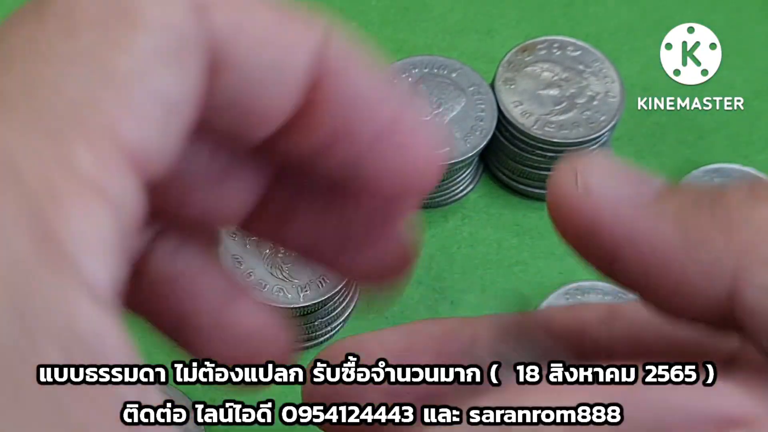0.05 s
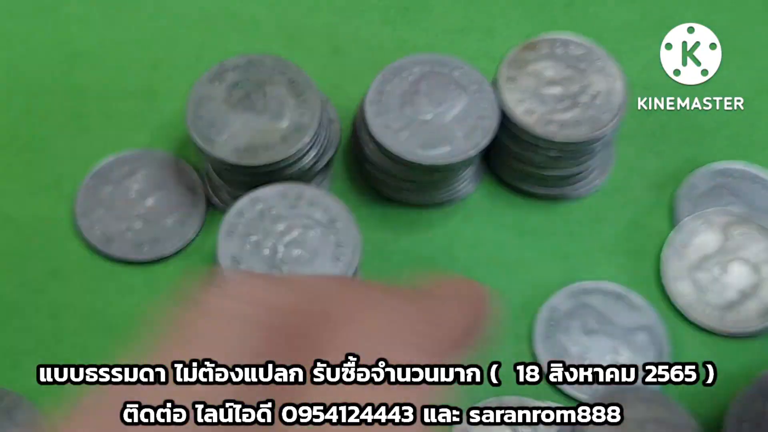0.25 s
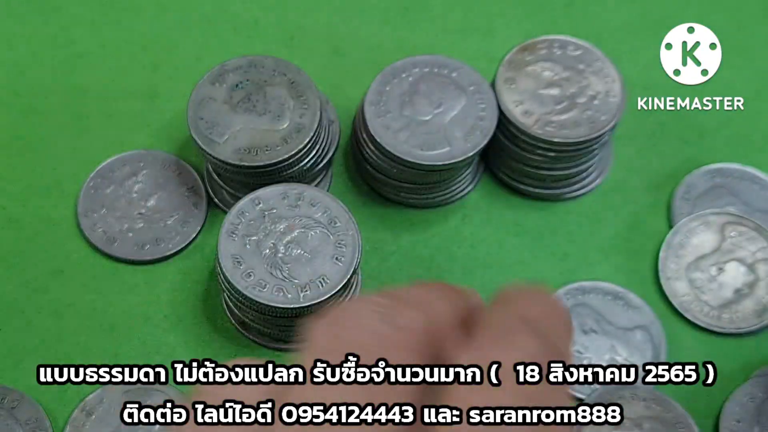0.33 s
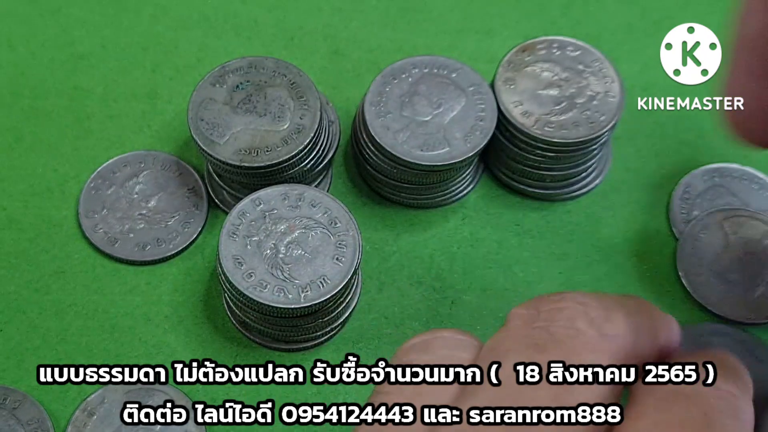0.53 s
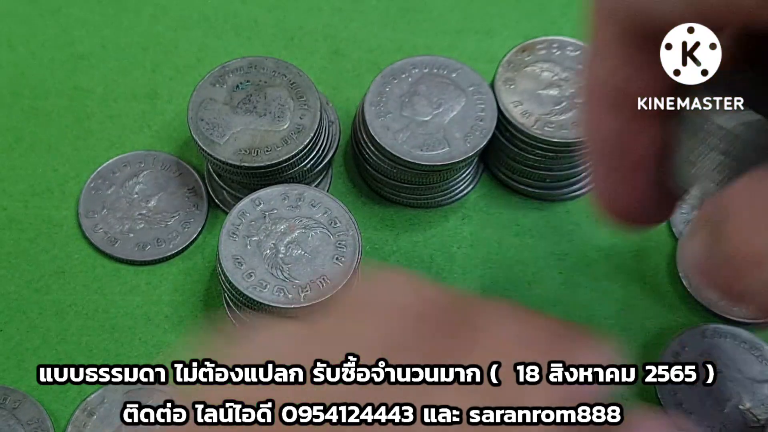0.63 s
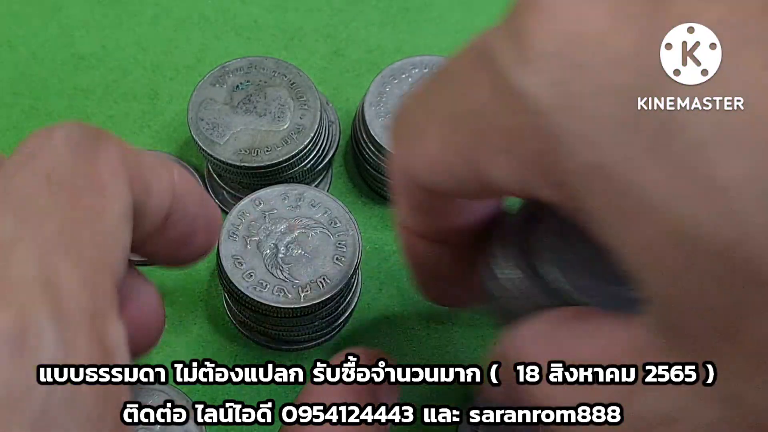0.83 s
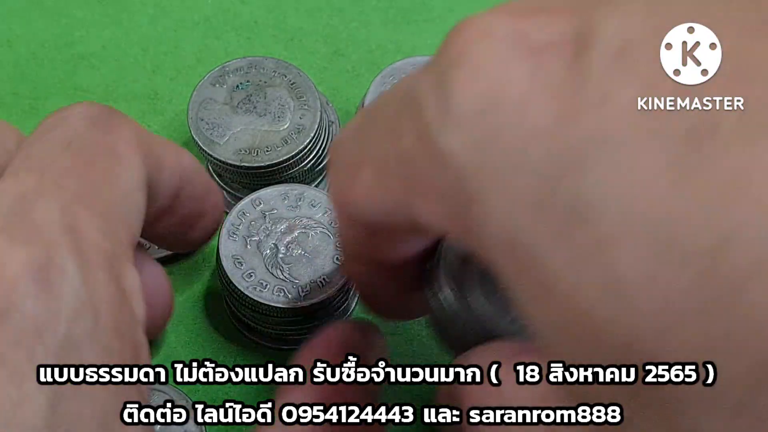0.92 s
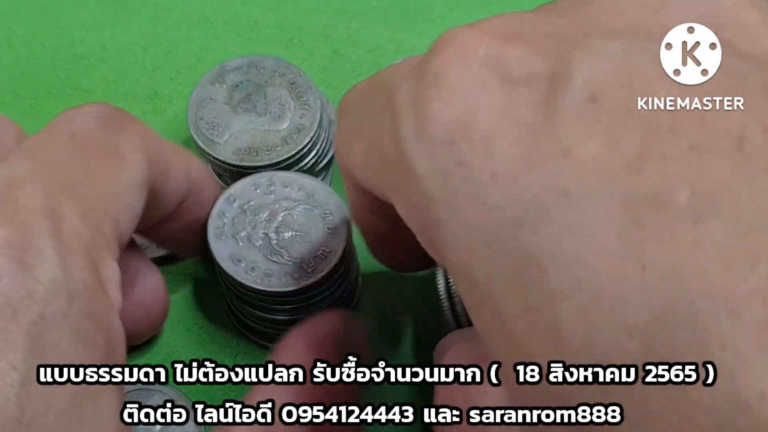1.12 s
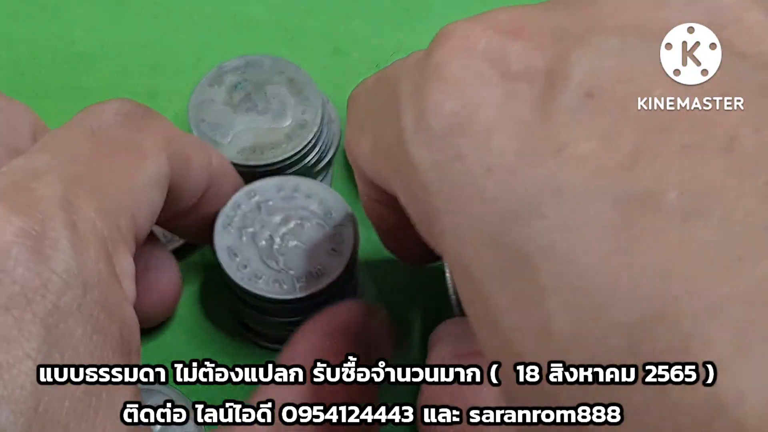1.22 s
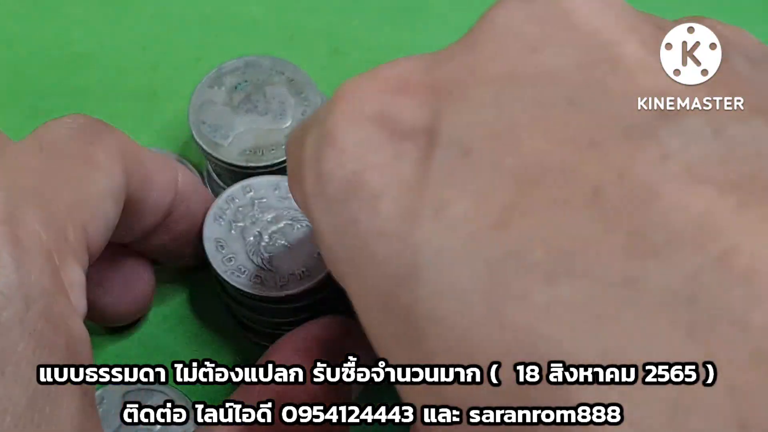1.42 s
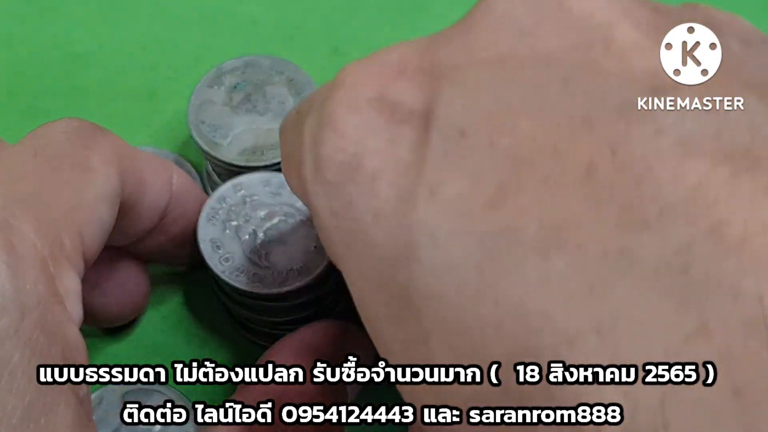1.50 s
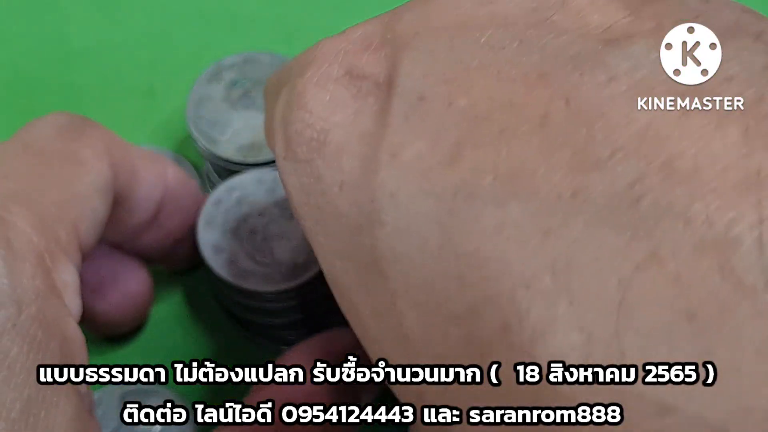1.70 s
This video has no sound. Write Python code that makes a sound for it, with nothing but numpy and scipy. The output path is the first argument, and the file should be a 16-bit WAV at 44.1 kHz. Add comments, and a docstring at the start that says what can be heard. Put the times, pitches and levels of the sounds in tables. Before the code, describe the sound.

Metal coins clink and tick as they are stacked by hand on a cloth-covered table.

```python
"""Metal coins, dropped, gathered and stacked on a cloth-covered table, close to the microphone.
Free coins clink with a high beating ring; held coins only tick and scrape against each other.
Hands bump and brush the table and drag the stacks over the cloth.
The place is a small room: a short tail follows each contact, over quiet air and a faint mains hum."""
import sys
import numpy as np
from scipy import signal
from scipy.fft import rfft, irfft
from scipy.io import wavfile

SR = 44100
rng = np.random.default_rng(int(sys.argv[2]) if len(sys.argv) > 2 else 0)


def waveform_to_disk(signal):
    """Save audio, clipped to [-1, 1], as 16-bit WAV at the path in sys.argv[1]."""
    frames = np.transpose(np.atleast_2d(signal))
    scaled = np.clip(frames, -1, 1) * 32767
    samples = np.round(scaled).astype(np.int16)
    wavfile.write(sys.argv[1], SR, samples)


N = 77175

# likeness of coin contacts at the microphone's two sides: f/Hz, correlation
CONTACT_LIKENESS = [(1500, .8), (2800, 0.063), (4500, -0.035), (8000, -0.23), (10000, 0.6), (12500, 0.092)]


def amp(db):
    """Decibels to gain."""
    return 10 ** (np.asarray(db) / 20)


def unit(x):
    """Scales to rms 1."""
    return x / np.sqrt(np.mean(x ** 2) + 1e-20)


def read(points, hz):
    """Reads a table on a log-frequency axis."""
    f, value = np.transpose(points)
    return np.interp(np.log(hz + 1), np.log(f), value)


def pan(db):
    """Left and right gains, the left louder by db."""
    return amp([[db / 2], [-db / 2]])


def add(mix, s, sound):
    """Mixes a sound in at s seconds."""
    part = mix[:, max(round(s * SR), 0):][:, :sound.shape[-1]]
    part += sound[..., :part.shape[1]]


def stereo_white(likeness, size):
    """Two channels of white noise, as alike as the table says at each frequency."""
    left, other = rfft(rng.standard_normal((2, size)))
    correlation = np.clip(read(likeness, np.fft.rfftfreq(size, 1 / SR)), -1, 1)
    right = correlation * left + np.sqrt(1 - correlation ** 2) * other
    return irfft(np.array([left, right]), size)


def noise(colour, likeness):
    """Steady coloured stereo noise at rms 1."""
    gain = amp(read(colour, np.fft.rfftfreq(N, 1 / SR)))
    return unit(irfft(rfft(stereo_white(likeness, N)) * gain, N))


def swells(strokes):
    """Level curve with one rounded swell for each stroke."""
    level = np.zeros((2, N))
    for s, length, db in strokes:
        arch = np.sqrt(np.sin(np.linspace(0, np.pi, round(length * SR), endpoint=False)))
        add(level, s, amp(db) * arch)
    return level


def room_tone(air_db=-55.5):
    """Air and faint mains hum, steady behind the table."""
    # spectrum of the air: f/Hz, relative level/dB
    air_colour = [(15, -25), (30, -5), (60, -4.5), (130, -8), (330, -15), (600, -8.5), (1070, -17.5),
                  (1900, -15.5), (3500, -26), (5900, -32), (12900, -38.5), (16000, -37.5)]
    # likeness of the air on the two sides: f/Hz, correlation
    air_likeness = [(50, 0.64), (250, 0.98), (600, .35), (1500, 0.083), (5000, 0.14), (12000, .1)]
    # mains harmonics: f/Hz, rms level/dB
    harmonics = [(49, -60), (98, -66), (196, -68), (245, -71.5), (294, -70), (343, -70), (392, -71)]
    t = np.arange(N) / SR
    hum = sum(amp(db) * np.sqrt(2) * np.sin(2 * np.pi * (hz * t + rng.random())) for hz, db in harmonics)
    return amp(air_db) * noise(air_colour, air_likeness) + hum


def small_room(x, delay_s=0.0017):
    """Nearby walls return a short diffuse tail, each band dying at its own speed."""
    # reverberation time: f/Hz, t60/s
    decay_times = [(300, 0.1), (1500, .24), (4000, 0.13), (10000, 0.2), (16000, 0.21)]
    hz, t, spectra = signal.stft(rng.standard_normal((2, SR // 2)), SR, nperseg=256)
    decay = amp(-60 * t / read(decay_times, hz)[:, None])
    tail = signal.istft(spectra * decay, SR, nperseg=256)[1]
    tail *= np.clip(np.arange(tail.shape[1]) / SR / delay_s - 1, 0, 1)  # a gap, then a fade-in
    return signal.fftconvolve(x, tail / np.linalg.norm(tail[0]), axes=1)[:, :N]


def hands():
    """Hands shift with a low rumble, left of the microphone, and drag stacks over the cloth."""
    # hands shifting on the table: t/s, length/s, level/dB
    shifts = [(0.85, 0.19, -50), (0.98, 0.4, -50), (1.308, 0.15, -50.5), (1.464, .17, -59.5)]
    # spectrum of their rumble: f/Hz, relative level/dB
    rumble_colour = [(15, -28), (35, -9), (60, -1.5), (85, -1.5), (130, -17.5), (400, -22.5), (900, -64),
                     (3000, -69)]
    # stacks being dragged: t/s, length/s, level/dB
    drags = [(0.6, 0.095, -56), (0.84, 0.14, -51), (1.17, 0.13, -57.5)]
    # spectrum of the rubbed cloth: f/Hz, relative level/dB
    cloth_colour = [(100, -28), (220, -3), (330, 4.5), (520, -4.5), (800, -14.5), (2000, -29),
                    (8000, -59.5)]
    # likeness of both sounds on the two sides: f/Hz, correlation
    likeness = [(50, .3), (300, 0.47), (1000, 0.3)]
    rumble = swells(shifts) * pan(db=12) * noise(rumble_colour, likeness)
    rubbing = swells(drags) * noise(cloth_colour, likeness)
    return rumble + rubbing


def table_knocks(rise_cycles=0.98):
    """Fingers and stacks land on the padded table and briefly sound its modes."""
    # landings: t/s, level/dB, f/Hz, t60/s
    knocks = [(0.001, -35.5, 321.5, .07), (0.2317, -36.5, 1824, .018), (0.257, -43, 1467, .035),
              (0.504, -42.5, 59.3, 0.23), (0.601, -39, 321, 0.032), (0.671, -43, 467, 0.032),
              (0.852, -47.5, 427, 0.05), (0.915, -52, 397, 0.051), (0.969, -51.5, 362, .1),
              (1.062, -46.5, 405, 0.039), (1.182, -43.5, 414, 0.046), (1.261, -54.5, 322, 0.12),
              (1.571, -44.5, 302, 0.025)]
    # table modes: ratio to the knock's pitch, relative level/dB
    modes = [(0.721, -2.5), (1, 2.5), (1.231, 2.5), (1.75, -7)]
    out, t = np.zeros((2, N)), np.arange(SR // 4) / SR
    for s, db, hz, t60 in knocks:
        body = sum(amp(mode_db) * np.sin(2 * np.pi * (hz * ratio * t + rng.random()))
                   for ratio, mode_db in modes)
        rise = np.minimum(t * hz / rise_cycles, 1)
        add(out, s, body * rise * amp(db - 60 * t / t60))
    return out


def metal(x, tilt_db, size=512):
    """Gives impulses the colour of coin on coin, tilted by tilt_db per octave above 1 kHz."""
    # spectrum of a contact: f/Hz, relative level/dB
    contact_colour = [(200, -51.5), (700, -33), (1200, -19), (1850, -20.5), (2350, -13.5), (2900, -3),
                      (4300, -1), (5300, 0.5), (6300, 0), (8200, 3.5), (9200, 3), (9700, 0.5), (10100, 9.5),
                      (10700, 2), (13000, 0.5), (15000, 0.5), (16200, -31.5)]
    hz = abs(np.fft.fftfreq(size, 1 / SR))
    octaves = np.log2(np.maximum(hz, 1000) / 7000)
    log_gain = np.log(amp(read(contact_colour, hz) + tilt_db * octaves))
    minimum_phase = np.exp(np.conj(signal.hilbert(log_gain)))  # nothing sounds before the hit
    taps = np.fft.ifft(minimum_phase).real
    return signal.fftconvolve(x, taps[None] / np.linalg.norm(taps), axes=1)


def rim_scrapes(grains_per_s=2200, spread_db=1):
    """Milled rims slide in dense runs of tiny uneven contacts."""
    # slides: t/s, length/s, level/dB
    slides = [(0.24, 0.037, -27.5), (0.28, 0.063, -43), (0.484, 0.017, -59), (0.542, 0.042, -60),
              (0.584, 0.034, -48), (0.617, 0.063, -40.5), (0.775, 0.056, -41), (1.12, 0.074, -55.5),
              (1.707, 0.044, -50.5)]
    touches = rng.random(N) < grains_per_s / SR
    strength = amp(spread_db * np.minimum(rng.exponential(1, N), 3))
    grains = unit(touches * strength * stereo_white(CONTACT_LIKENESS, N))
    return metal(swells(slides) * grains, tilt_db=-2)[:, :N]


def coin_click(tilt_db, rise_s=0.00055, t60=0.012, crack_db=-7.5, crack_at_s=0.000504, size=1024):
    """Two coins meet: one sharp crack inside a brief chatter."""
    t = np.arange(size) / SR
    envelope = (1 - np.exp(-t / rise_s)) * amp(-60 * t / t60)
    chatter = stereo_white(CONTACT_LIKENESS, size) * envelope
    chatter /= np.linalg.norm(chatter, axis=1, keepdims=True)
    crack = amp(crack_db) * np.sinc((t - crack_at_s) * SR)
    return metal(np.linalg.norm(envelope) * (chatter + crack), tilt_db)


def coin_ring(hz, beat_hz, t60, lower_db=-2, wobble_hz=22, wobble_s=0.011):
    """A coin's bending mode: two close tones that beat, and waver as the coin rocks."""
    t = np.arange(SR // 2) / SR
    pole = np.exp(-1 / (wobble_s * SR))
    wander = unit(signal.lfilter([1], [1, -pole], rng.standard_normal((2, 2, len(t)))))
    drift_cycles = wobble_hz * np.cumsum(wander, axis=-1) / SR
    # each tone's phase at the left and right of the microphone
    upper_rad, lower_rad = np.array([[0], [2.14]]), np.array([[0], [-1.6]])
    upper = np.sin(2 * np.pi * (hz * t + drift_cycles[0]) + upper_rad)
    lower = np.sin(2 * np.pi * ((hz - beat_hz) * t + drift_cycles[1]) + lower_rad)
    return (upper + amp(lower_db) * lower) * amp(-60 * t / t60)


def coins():
    """Right at the microphone, free coins click and ring while held ones only click."""
    # free coins striking: t/s, click level/dB, click tilt/(dB/octave), ring level/dB,
    # ring f/Hz, beat f/Hz, ring t60/s, left over right/dB
    clinks = [(0.2337, -10, -1, -15, 10096, 120.6, 0.16, 0), (0.2408, -23, -4, -34, 10204, 110, 0.051, 1),
              (0.2502, -20, 1, -22, 10090, 200, .06, -16), (0.2591, -10.5, -2, -14, 10085, 97, 0.17, 2.5),
              (0.2622, -41.5, -8, -52.5, 9990, 51.1, 0.78, -3),
              (0.481, -47, -4.5, -47.5, 10060, 60, 0.047, 12.5),
              (0.6398, -34.5, -7, -25.5, 10144, 64, 0.033, -6),
              (0.6693, -41.5, -10, -34.5, 9929, 188, 0.11, 6),
              (0.772, -29, 2, -41.5, 10096, 51, 0.47, -11.5),
              (0.8018, -21.5, 1, -34.5, 10140, 170, .09, 1.5), (0.85, -15.5, 1, -12, 10290, 210, 0.1, -3.5),
              (0.8728, -19, 12, -24.5, 10034, 200, 0.078, 2),
              (0.8788, -29.5, 1, -37, 10244, 135, 0.057, 24.5), (1.0093, -44, 26, -34, 10090, 90, 0.03, 10),
              (1.0112, -41, 4, -32.5, 5180, 200, 0.018, 1)]
    # held coins touching: t/s, level/dB, tilt/(dB/octave), left over right/dB
    ticks = [(0.036, -42.5, -2, 4), (0.2563, -21, -1, 6), (0.455, -47.5, -4.5, -6),
             (0.5931, -43, -8.5, -11), (0.602, -43, -19, 2), (0.6135, -46.5, -11, -15), (0.6225, -32, 0, 9),
             (0.636, -46, 1, -5), (0.653, -50, -15, 20), (0.6721, -36, -7.5, -8), (0.7630, -35.5, 0, -10),
             (0.7675, -50, 0.5, 23), (0.781, -27, 3, 14), (0.7850, -49, 7, 1), (0.7863, -43, 2, -3),
             (0.8182, -44, 9, -6), (0.8216, -37, 8, 6), (0.8808, -30.5, -2.5, -21), (1.061, -57, -5, -7),
             (1.0892, -49, -8, 5), (1.112, -53.5, -9, -1), (1.128, -34, -2, 3), (1.1426, -46, -15, -2),
             (1.1541, -49, -10, 3), (1.1812, -29.5, -1, 6.5), (1.188, -40, -8, -5),
             (1.2417, -36.5, -0.5, 4.5), (1.2587, -57, -5, -5), (1.3927, -55, -2, 6),
             (1.3990, -53.5, -1.5, 1), (1.4510, -47.5, -13.5, 4), (1.5167, -53, -11.5, 2),
             (1.656, -52.5, -5.5, 3), (1.685, -58, -3, 13), (1.7187, -41, 11, 10), (1.7326, -35, 1, 7)]
    clicks, rings = np.zeros((2, 2, N))
    for s, db, tilt_db, ring_db, hz, beat_hz, t60, pan_db in clinks:
        add(clicks, s, amp(db) * pan(pan_db) * coin_click(tilt_db))
        add(rings, s, amp(ring_db) * pan(pan_db) * coin_ring(hz, beat_hz, t60))
    for s, db, tilt_db, pan_db in ticks:
        add(clicks, s, amp(db) * pan(pan_db) * coin_click(tilt_db))
    return clicks, rings


def scene(contact_send_db=-4.5, ring_send_db=-15):
    """Coins, table and hands up close, with the small room behind them."""
    clicks, rings = coins()
    contacts = clicks + rim_scrapes() + table_knocks()
    reflections = small_room(amp(contact_send_db) * contacts + amp(ring_send_db) * rings)
    return contacts + rings + reflections + hands() + room_tone()


def record(dry):
    """The recorder's band limit cuts the highest treble."""
    edge_hz = 15650
    lowpass = signal.firwin(201, edge_hz, window=("kaiser", 8), fs=SR)
    return signal.oaconvolve(dry, lowpass[None], "same")


dry = scene()
out = record(dry)
waveform_to_disk(out)
```